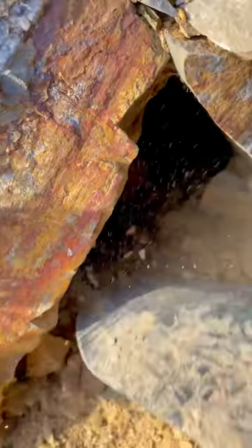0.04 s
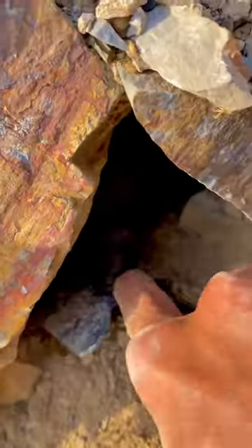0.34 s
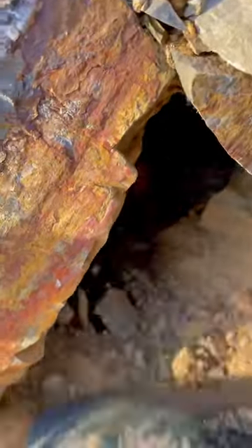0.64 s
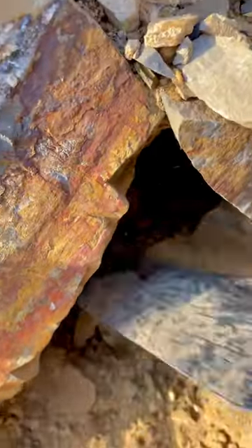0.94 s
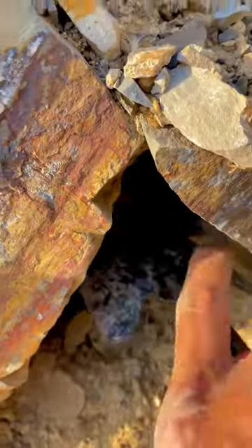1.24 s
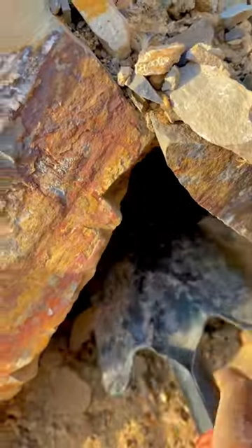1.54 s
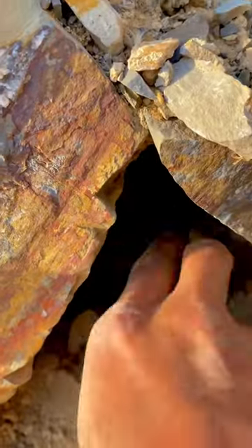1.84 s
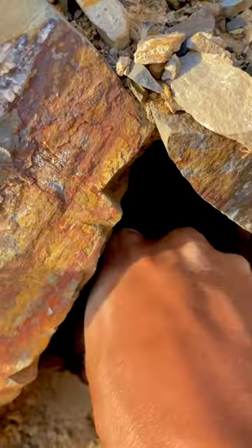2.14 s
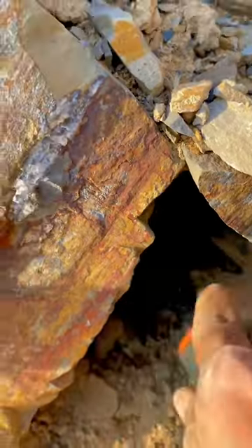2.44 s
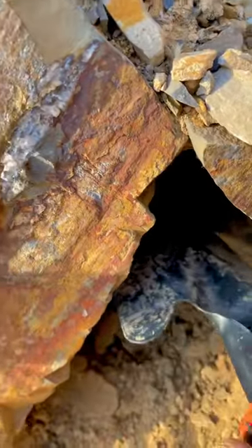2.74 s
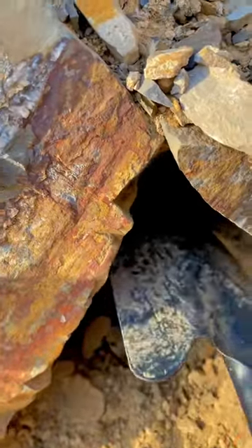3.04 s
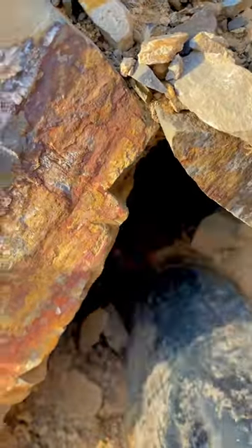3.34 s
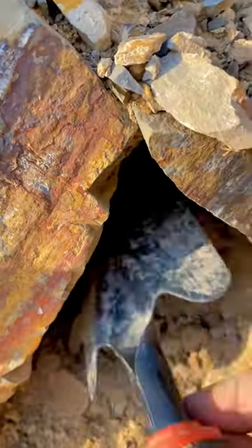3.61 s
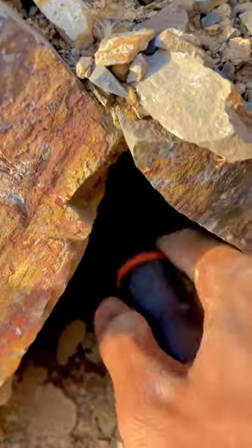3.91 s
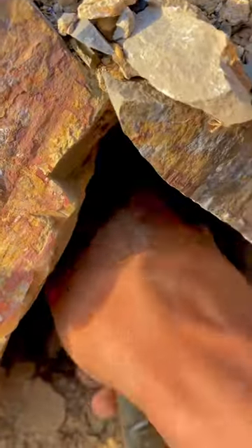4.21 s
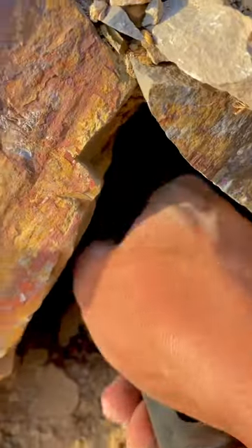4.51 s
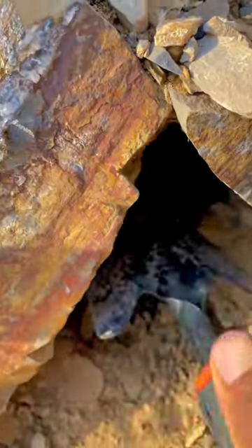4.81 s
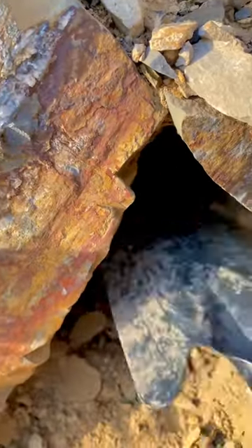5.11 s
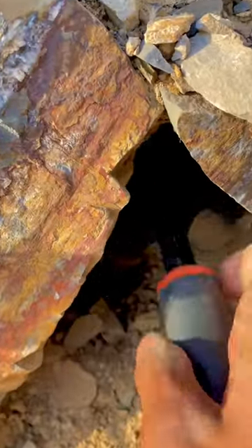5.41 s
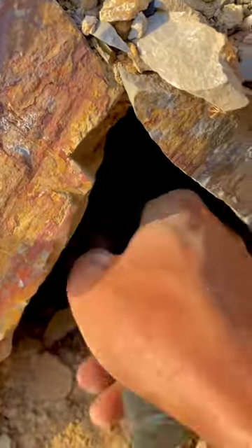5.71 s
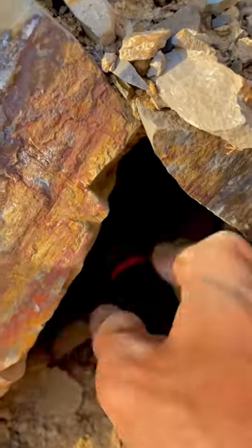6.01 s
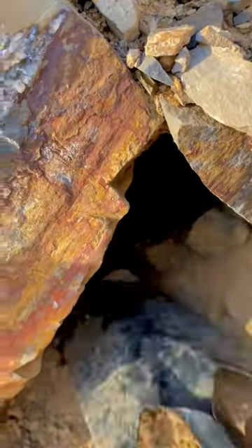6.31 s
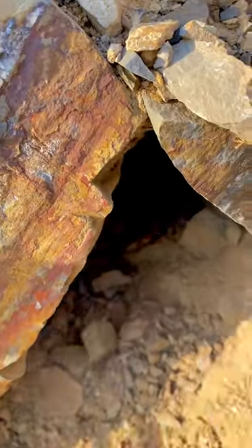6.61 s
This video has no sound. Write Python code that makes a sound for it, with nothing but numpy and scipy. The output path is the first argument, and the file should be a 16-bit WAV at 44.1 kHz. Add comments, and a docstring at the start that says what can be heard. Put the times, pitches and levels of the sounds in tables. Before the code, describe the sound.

A small metal trowel digs gravel from between rocks, with close gritty scrapes, sharp crunches and short steel clinks outdoors.

```python
"""Gritty scrapes and the clink of steel: a small trowel digs gravel from a hollow between rocks, close by.
Stick-slip friction makes the scraping; impacts and jammed stones make the knocks and crunches.
These contacts drive the blade's modes, which soil damps and which ring on when the blade comes free.
Pebbles drop, hard pushes and handling give dull thuds, and the rock walls return short echoes.
Under it all lies a low rumble of moving outdoor air, with a puff of wind near the end."""
import sys
import numpy as np
from scipy import signal
from scipy.fft import rfft, irfft, next_fast_len
from scipy.io import wavfile
from scipy.ndimage import uniform_filter1d

SR = 44100
rng = np.random.default_rng(int(sys.argv[2]) if len(sys.argv) > 2 else 0)


def wav_out(sig):
    """Save sig, one row per channel (or a flat mono array), as 16-bit PCM at SR to the path in sys.argv[1]."""
    wavfile.write(sys.argv[1], SR, np.round(np.clip(np.atleast_2d(sig).T, -1, 1) * 32767).astype(np.int16))


N = 297675
BAND_LIMIT_HZ = 15900

EASE_IN_DB, EASE_OUT_DB = 7, 10  # the arm leans into a stroke, then lets up
TRICKLE_DB, TRICKLE_T60_S = -23.5, 0.5  # loosened sand runs on; level relative to the hardest push
# Pushes of the blade through grit: (start [s], length [s], relative peak level [dB],
# place of the peak in the stroke [0-1], spectral tilt [dB/octave])
STROKES = [(0.054, 0.22, -42, 0.47, 2.5), (0.35, 0.26, -27.5, 1, -3), (0.597, 0.18, -25, 0.3, 1),
           (0.977, 0.17, -34, 0.33, -4), (2.243, 0.3, -36.5, 0, -1), (2.81, 0.18, -39.5, 0.2, 0),
           (3.366, 0.079, -38, 0.1, 2.5), (3.683, 0.24, -38, 0.42, 0), (3.973, 0.27, -51, 0.07, 2.5),
           (4.395, 0.41, -40.5, 0.63, -1.5), (4.824, 0.11, -20.5, 0.84, 5), (5.198, 0.16, -34, 0.07, -0.5),
           (5.452, 0.2, -40, 0.88, 3), (5.681, 0.09, -39, 0.1, -3.5), (5.827, 0.088, -32, 0.19, 1),
           (5.958, 0.13, -31.5, 0.75, -2.5), (6.144, 0.18, -35, 0.6, -4.5), (6.371, 0.12, -41, 0.59, 1.5)]
def scraping(level_db=-2.0, slip_db=3.0, slip_hz=70, fade_s=.02):
    """Stick-slip friction: the edge catches and lets go, so the grains snap in clumps."""
    force = np.zeros(N)
    for start, length, db, hardest, slope in STROKES:
        t = np.arange(0, length + .5, 1 / SR)
        sand = grains(len(t), per_s=3000, spread_db=3.5, dust=.25)
        clumps = unit(shifting_colour(sand) * amp(slip_db * wander(len(t), slip_hz)))
        grit = unit(stone_colour(clumps + .75 * gravel(len(t)), slope, stone_db=2))
        touch = np.clip(np.minimum(t, length + fade_s - t) / fade_s, 0, 1)
        push_db = np.interp(t / (length + fade_s), [0, hardest, 1], [-EASE_IN_DB, 0, -EASE_OUT_DB])
        trickle = (t > length) * amp(TRICKLE_DB - 60 * (t - length) / TRICKLE_T60_S)
        envelope = np.maximum(touch * amp(push_db), trickle)
        add(force, start - fade_s / 2, grit * amp(level_db + db) * envelope)
    return force


def grains(count, per_s, spread_db, dust):
    """Shot noise: sand grains snap at random with unequal strength, over the hiss of fine dust."""
    snaps = rng.random(count) < per_s / SR
    strength = amp(spread_db * np.minimum(rng.exponential(1, count), 4))
    sign = rng.choice([-1, 1], count)
    return unit(unit(sign * snaps * strength) + dust * rng.standard_normal(count))


def gravel(count, per_s=110, spread_db=6, pitch_hz=3800, t60=0.025):
    """Random impacts: the edge flicks small stones aside, many faintly and a few loudly."""
    out = np.zeros(count)
    for place, rank, pitch in rng.random((int(per_s * count / SR), 3)):
        strength = amp(-spread_db * np.log(rank + 0.025))
        add(out, place * count / SR, strength * stone_tick(pitch_hz * 2 ** (2 * pitch - 1), t60))
    return unit(out)


def stone_colour(x, slope, stone_db=3.5):
    """Contact hardness tilts the spectrum (hard is bright), and each stone adds broad resonances."""
    knots_hz = np.geomspace(400, 16000, num=36)
    resonances = np.c_[knots_hz, stone_db * rng.standard_normal(len(knots_hz))]
    octaves = lambda hz: np.log2(np.clip(hz, 1000, 11000) / 4000)
    return shaped(x, lambda hz: amp(slope * octaves(hz) + read(resonances, hz)))


def shifting_colour(x, depth_db=3.0, size=5):
    """Spectral modulation: the edge meets ever new stones, so the colour of a scrape keeps shifting."""
    spectrogram = signal.stft(x)[2]
    patches = uniform_filter1d(rng.standard_normal(spectrogram.shape), size, axis=0)
    patches = uniform_filter1d(patches, size, axis=1)
    return signal.istft(spectrogram * amp(depth_db * unit(patches)))[1][:len(x)]


# Blows of steel on stone: (time [s], relative level [dB], spectral tilt [dB/octave], resonance [Hz])
KNOCKS = [(0.062, -33.5, 10.5, 6000), (0.25, -28.5, 0, 1127), (0.266, -25.5, -2.5, 1170),
          (0.6626, -14, 3.5, 5845), (0.7, -12, 1.5, 4090), (0.8518, -21.5, -1, 1090),
          (1.004, -27.5, 0.5, 1970), (1.085, -31, -5.5, 10800), (1.5632, -21.5, -4, 2400),
          (1.6831, -34.5, -1.5, 3540), (1.7336, -36, -0.5, 1290), (1.996, -23.5, -1, 2460),
          (2.126, -33.5, -1.5, 5300), (2.358, -32, -3.5, 3350), (2.401, -32, -16, 2680),
          (2.594, -32, -1, 880), (2.635, -30, -3.5, 11400), (2.9223, -32, -2, 1660), (3.177, -33.5, 5, 910),
          (3.3364, -18, 0, 4630), (3.497, -30.5, -6.5, 1340), (3.687, -32, -1, 2700),
          (3.7673, -34, -3, 3020), (4.13, -37, -5, 4950), (4.633, -27.5, 1, 846), (4.822, -27, -2.5, 850),
          (4.9047, -18, 6, 1000), (5.075, -23.5, -1, 7340), (5.19, -30, 3.5, 1660),
          (5.208, -31.5, 1.5, 2430), (5.3115, -31, 2, 4220), (5.679, -34, -3.5, 8400),
          (5.715, -30.5, 1, 1060), (5.8525, -26.5, -0.5, 1610), (6.029, -21.5, -0.5, 1700),
          (6.131, -22, -9, 11000), (6.178, -18, -5, 2870), (6.2111, -31, -6, 9960),
          (6.2887, -13.5, -4, 10650), (6.716, -19.5, -3.5, 9450)]
def knocking(level_db=-1.5, crack_s=0.0028, t60=0.089, scuff_s=0.0058, stone_db=9.0):
    """Impact excitation: the edge scuffs through dust, cracks on a resonant stone, and gravel rattles."""
    force, t = np.zeros(N), np.arange(-SR // 50, SR // 8) / SR
    scuff = 0.27 * np.exp(-abs(t) / scuff_s)
    crack = 4.5 * np.exp(-abs(t) / crack_s)
    rattle = amp(-60 * t / t60)
    envelope = np.where(t < 0, scuff, crack + rattle)
    for s, db, slope, stone_hz in KNOCKS:
        burst = grains(len(t), per_s=9900, spread_db=2.5, dust=0.55) * envelope
        burst = stone_colour(burst, slope, stone_db=3.0)
        knock = shaped(burst, lambda hz: amp(stone_db * bell(hz, stone_hz, octaves=0.5)))
        attack_rms = np.sqrt(np.mean(knock[(t > 0) & (t < .01)] ** 2))
        add(force, s + t[0], amp(db + level_db) * knock / attack_rms)
    return force


# Jammed stones: (peak time [s], relative level [dB], time constant [s], spectral tilt [dB/octave])
CRUNCHES = [(0.154, -26, 0.01, 2), (0.3065, -7, 0.0023, -2), (0.62, -13, 0.0075, -1),
            (0.638, -12.5, 0.0053, -2.5), (4.688, -22, 0.0066, -4), (4.848, -27, 0.017, -12),
            (4.875, -10, 0.004, 1), (6.308, -11.5, 0.0098, 0.5), (6.326, -17.5, 0.0055, 1)]
def crunching(level_db=-5.0):
    """Stress release: a stone jams, grinds and lets go in a brief burst of slips."""
    force = np.zeros(N)
    for s, db, tau, slope in CRUNCHES:
        t = np.arange(-4 * tau, 4 * tau, 1 / SR)
        slips = grains(len(t), per_s=6900, spread_db=-2.0, dust=0.99)
        burst = stone_colour(slips * np.exp(-abs(t) / tau), slope)
        core_rms = np.sqrt(np.mean(burst[abs(t) < tau] ** 2))
        add(force, s + t[0], amp(db + level_db) * burst / core_rms)
    return force


# Spectrum of steel on grit: (frequency [Hz], relative spectral level [dB])
GRIT_SPECTRUM = [(60, -28), (350, -15), (800, -8.5), (1400, -9.5), (2000, -2.5), (2600, 2), (3300, 2.5),
                 (5000, -2), (7000, -5.5), (10000, 1.5), (13000, -2.5), (15000, -15.5)]
def direct_contact(force, size=2048):
    """Direct radiation: a minimum-phase response colours the contacts and keeps their onsets sharp."""
    log_gain = np.log(amp(read(GRIT_SPECTRUM, abs(np.fft.fftfreq(size, 1 / SR)))))
    response = np.fft.ifft(np.exp(np.conj(signal.hilbert(log_gain)))).real[:size // 2]
    return signal.oaconvolve(force, response / np.linalg.norm(response))[:N]


# Modes of the steel blade: (frequency [Hz], relative level [dB], T60 when free [s])
BLADE_MODES = [(646, -3, 0.11), (1066, -11, 2.0), (1324, -19, 0.4), (1545, -17, 1.1), (1890, -20, 0.17),
               (2094, -6, 0.14), (2536, -5, 0.08), (2611, -11, 0.26), (3341, -8, 0.5), (4129, -7, 0.1),
               (4705, -12, 0.17), (4762, -9, 0.16), (5130, -11, 0.18), (5819, -16, 0.15), (6320, -11, 0.09),
               (6761, -14, 0.18), (8500, -12, 0.08), (9216, -15, 0.2), (9966, -15, 0.12), (10720, -14, 0.1),
               (11300, -15, 0.1)]
def pressed_blade(force, slope=0.3, shift_db=4.5, soil_t60=.08):
    """Forced vibration: contacts drive the blade's modes, and soil damps the low ones most."""
    out, t = np.zeros(N), np.arange(SR // 6) / SR
    rings = []
    for hz, db, t60 in BLADE_MODES:
        fall_db = 60 * t * (1 / t60 + np.sqrt(1000 / hz) / soil_t60)
        rings.append(amp(db + slope * np.log2(hz / 1000) - fall_db) * np.sin(2 * np.pi * hz * t))
    for ring in rings:
        coupling = amp(shift_db * (wander(N, 9) - 1.5))  # as the contact point moves, other modes lead
        out += signal.oaconvolve(force * coupling, ring)[:N]
    return out / np.linalg.norm(rings)


FAVOUR_DB, FAVOUR_OCTAVES = 17.5, 0.1  # the point of contact picks out neighbouring modes
# Blows that free the blade: (time [s], return to soil [s], relative level [dB], favoured pitch [Hz])
RELEASES = [(-0.15, 0.156, -28, 3350), (0.161, 0.25, -43, 3480), (0.861, 0.975, -34, 1153),
            (1.564, 1.714, -28.5, 2200), (1.731, 1.99, -50, 5300), (3.175, 3.32, -43.5, 3450),
            (3.334, 3.48, -40.5, 680), (3.496, 3.7, -36.5, 1140), (3.776, 4.02, -45.5, 4950),
            (4.703, 4.743, -44.5, 3300), (4.875, 4.908, -32, 3340), (5.083, 5.182, -37.5, 1127),
            (6.714, 6.748, -30.5, 5400)]
def free_blade(stop_t60=0.099):
    """Free vibration: knocked clear, the blade sings; back in the soil its high modes die first."""
    out, t = np.zeros(N), np.arange(SR * 2 // 3) / SR
    for s, until, blow_db, favoured_hz in RELEASES:
        buried_s = np.maximum(t - (until - s), 0)
        for hz, db, t60 in BLADE_MODES:
            fall_db = 60 * (t / t60 + buried_s / stop_t60 * np.sqrt(hz / 1000))
            envelope = amp(blow_db + db + FAVOUR_DB * bell(hz, favoured_hz, FAVOUR_OCTAVES) - fall_db)
            add(out, s, rng.choice([-1, 1]) * envelope * np.sin(2 * np.pi * hz * t))
    return out


# Loose pebbles landing on rock: (time [s], relative level [dB], centre pitch [Hz])
PEBBLES = [(0.446, -25.5, 6840), (0.6865, -19.5, 8800), (0.8283, -31, 3740), (0.924, -31.5, 8130),
           (0.967, -32.5, 8760), (1.051, -30, 7000), (1.111, -31, 3170), (1.188, -35, 8500),
           (1.2359, -34.5, 5560)]
def falling_pebbles(level_db=6, t60=0.021):
    """Damped impacts: pebbles land with a dry tick, clear of the blade."""
    out = np.zeros(N)
    for s, db, hz in PEBBLES:
        add(out, s, amp(level_db + db) * stone_tick(hz, t60))
    return out


def stone_tick(hz, t60, spread=0.45, count=12):
    """Modal superposition: a small stone sounds a cluster of short-lived modes around its pitch."""
    t = np.arange(SR // 25) / SR
    modes_hz = np.minimum(hz * np.exp(spread * rng.standard_normal(count)), BAND_LIMIT_HZ)
    return np.sin(2 * np.pi * np.outer(t, modes_hz)).sum(axis=1) * amp(-60 * t / t60) / np.sqrt(count)


# Dull low thuds: (peak time [s], level [dB], time constant [s])
THUDS = [(0.303, -42, 0.029), (0.656, -35, 0.048), (4.848, -46, 0.057), (6.17, -48, 0.1)]
def low_thuds(centre_hz=350):
    """Soft contacts give low-band noise: hard pushes into earth and, near 6.2 s, soft handling thumps."""
    t = np.arange(N) / SR
    band = lambda hz: 1 / (1 + (2 * np.log2((hz + 1) / centre_hz)) ** 2)
    noise = unit(shaped(rng.standard_normal(N), band))
    return noise * sum(amp(db) * np.exp(-abs(t - s) / tau) for s, db, tau in THUDS)


# Phase between the two microphone ports: (frequency [Hz], lead of the left [rad])
PORT_PHASE = [(0, 0), (600, -1.3), (1030, -.1), (2400, -.3), (3400, -4), (5340, -5.9), (7200, -3.2),
              (10500, 0), (15600, 6)]
# Balance between the ports: (frequency [Hz], left minus right [dB])
PORT_BALANCE = [(100, 2.5), (550, -7.5), (1900, -0.5), (3400, -2), (5000, -0.5)]
def stereo_paths(x):
    """Path difference: sound from the hollow reaches the two ports with unequal phase and level."""
    side = np.array([[.5], [-.5]])
    phase = lambda hz: side * np.interp(hz, *np.transpose(PORT_PHASE))
    return shaped(x, lambda hz: amp(side * read(PORT_BALANCE, hz)) * np.exp(1j * phase(hz)))


def rock_echoes(x, level_db=-8, t60=0.03, positions=6):
    """Early reflections: the rock walls scatter short echoes that change as the blade moves about."""
    t, out = np.arange(SR // 10) / SR, np.zeros((2, N))
    weights = np.array([wander(N, 10) for _ in range(positions)])
    for share in weights / np.linalg.norm(weights, axis=0):
        echoes = rng.standard_normal((2, len(t))) * amp(-60 * t / t60)
        out += signal.oaconvolve((x * share)[None], echoes / np.linalg.norm(echoes[0]), axes=1)[:, :N]
    return amp(level_db) * out


# Envelope of a puff of wind: (time [s], level [dB])
PUFF = [(6.52, -62.5), (6.69, -37), (6.75, -41.5)]
def wind_puff(corner_hz=180):
    """Turbulent pressure: wind brushes the microphone ports with a brief, low rumble."""
    noise = rng.standard_normal(N) + .5 * rng.standard_normal((2, N))
    gust = unit(shaped(noise, lambda hz: hz / (hz + 90) / (1 + (hz / corner_hz) ** 2)))
    return gust * amp(np.interp(np.arange(N) / SR, *np.transpose(PUFF), left=-120))


# Spectrum of the outdoor air: (frequency [Hz], relative spectral level [dB])
AIR_SPECTRUM = [(22, -21), (60, 4), (130, -3), (300, -21), (1000, -25), (4000, -36), (16000, -43)]
def moving_air(rumble_db=-52.0, hiss_db=-52.5, lump_db=4.5):
    """Partly coherent noise: a lumpy air rumble, mostly shared by the ports, under a steady hiss."""
    noise = rng.standard_normal(N) + .5 * rng.standard_normal((2, N))
    noise = unit(shaped(noise, lambda hz: amp(read(AIR_SPECTRUM, hz))))
    low = shaped(noise, lambda hz: 1 / (1 + (hz / 300) ** 4))
    rumble = unit(low * amp(lump_db * wander(N, 26)))
    return amp(rumble_db) * rumble + amp(hiss_db) * (noise - low)


def amp(db):
    """Decibels to amplitude ratio."""
    return 10 ** (np.asarray(db) / 20)


def unit(x):
    """Normalisation to rms 1."""
    return x / np.sqrt(np.mean(x ** 2) + 1e-20)


def read(points, hz):
    """Interpolation of a table on a log-frequency axis."""
    knots_hz, values = np.transpose(points)
    return np.interp(np.log(hz + 1), np.log(knots_hz + 1), values)


def bell(hz, centre_hz, octaves):
    """Gaussian of height 1 on a log-frequency axis."""
    return np.exp(-(np.log2((hz + 1) / centre_hz) / octaves) ** 2)


def wander(count, hz):
    """Slow random modulation with a standard deviation near 1."""
    knots = rng.standard_normal(int(count * hz / SR) + 3)
    return 1.26 * np.interp(np.arange(count) * hz / SR, np.arange(len(knots)), knots)


def shaped(x, gain):
    """Linear filtering by a gain given as a function of frequency."""
    size = next_fast_len(x.shape[-1] + 2048)
    return irfft(rfft(x, size) * gain(np.fft.rfftfreq(size, 1 / SR)), size)[..., :x.shape[-1]]


def add(mix, s, sound):
    """Superposition of a sound at time s, which may be negative."""
    at = round(s * SR)
    sound = sound[max(-at, 0):]
    part = mix[max(at, 0):][:len(sound)]
    part += sound[:len(part)]


# Freedom of the blade to ring, low when deep in soil: (time [s], level relative to direct drive [dB])
LOOSENESS = [(0.6, -7.5), (2.3, -2.5), (2.65, 0), (4.0, 2), (4.65, -4), (5.55, 6), (6.0, -10), (6.4, -2)]
def scene():
    """Contacts radiate directly and through the blade; the looser the blade, the larger its share."""
    force = scraping() + knocking() + crunching()
    loose = amp(np.interp(np.arange(N) / SR, *np.transpose(LOOSENESS)))
    force = force / np.hypot(1, loose / 2)
    contacts = direct_contact(force) + pressed_blade(force * loose)
    digging = contacts + falling_pebbles() + low_thuds()
    return stereo_paths(digging + free_blade()) + rock_echoes(digging) + moving_air() + wind_puff()


def record(dry):
    """Clipping at full scale, then low-pass filtering."""
    lowpass = signal.firwin(401, BAND_LIMIT_HZ, window=("kaiser", 8), fs=SR)
    return signal.oaconvolve(np.clip(dry, -1, 1), lowpass[None], "same")


dry = scene()
out = record(dry)
wav_out(out)
```